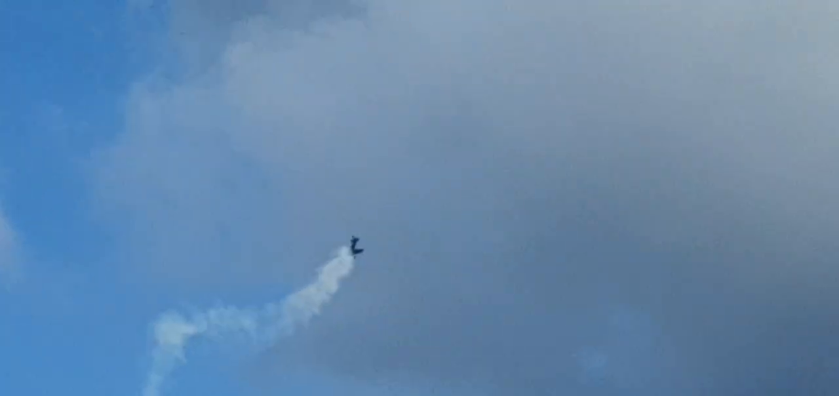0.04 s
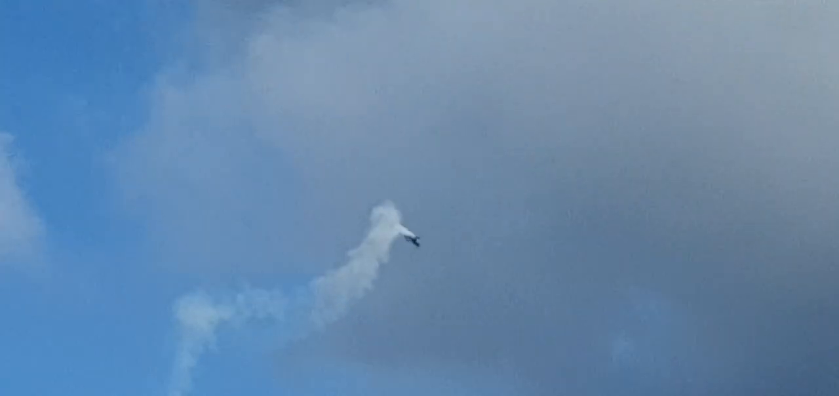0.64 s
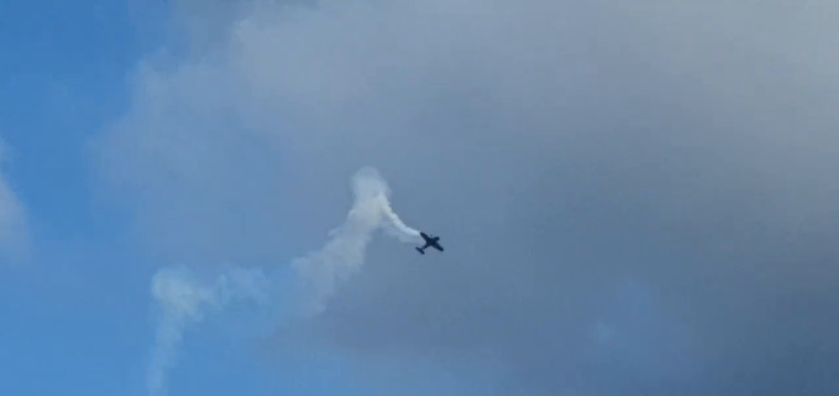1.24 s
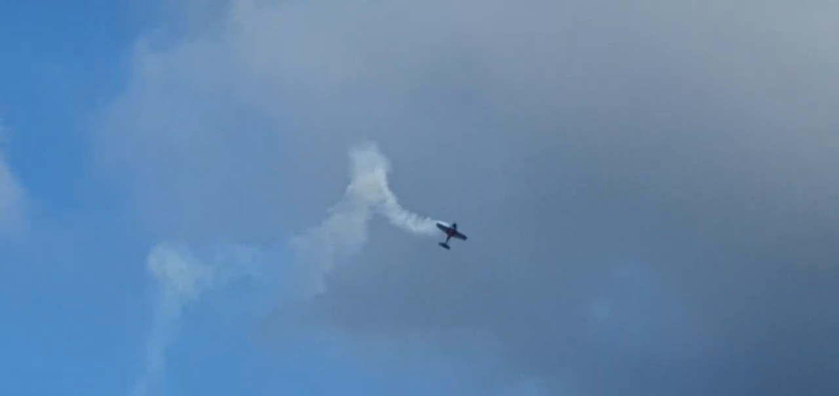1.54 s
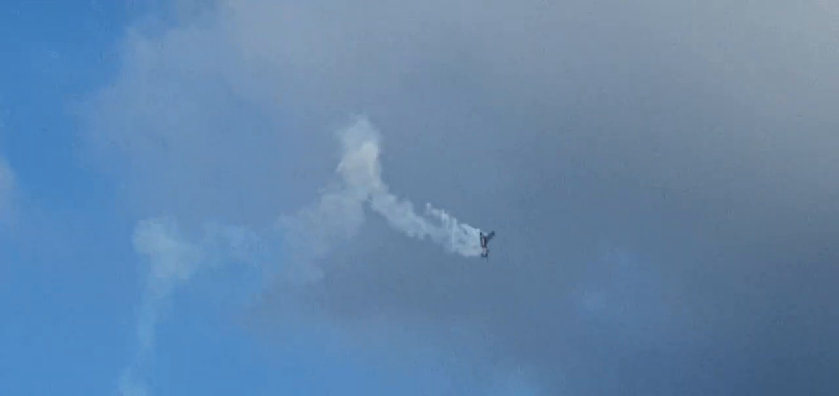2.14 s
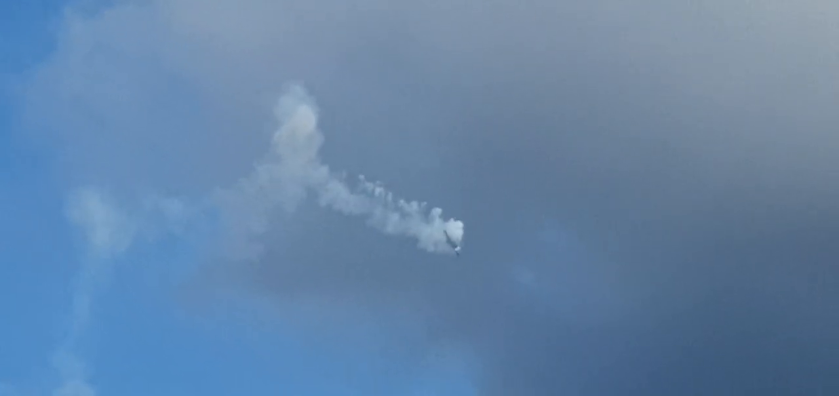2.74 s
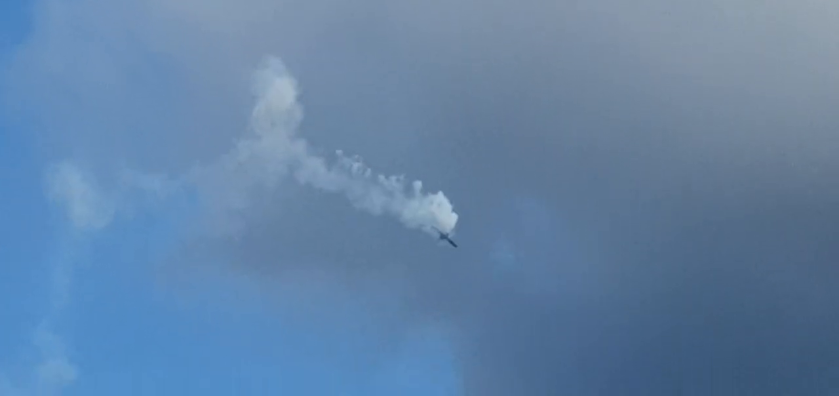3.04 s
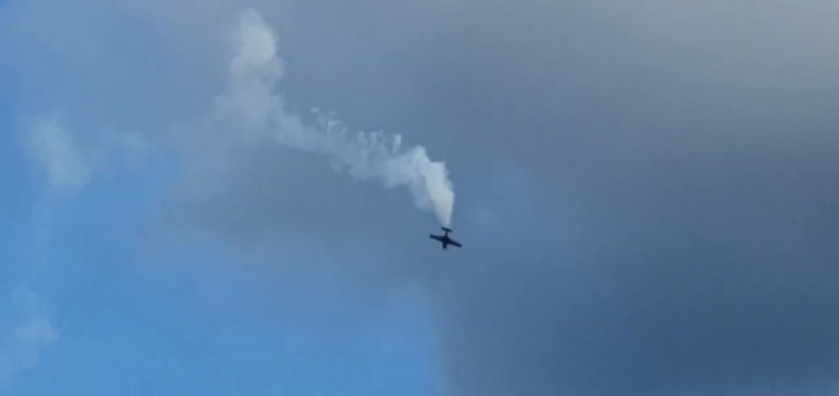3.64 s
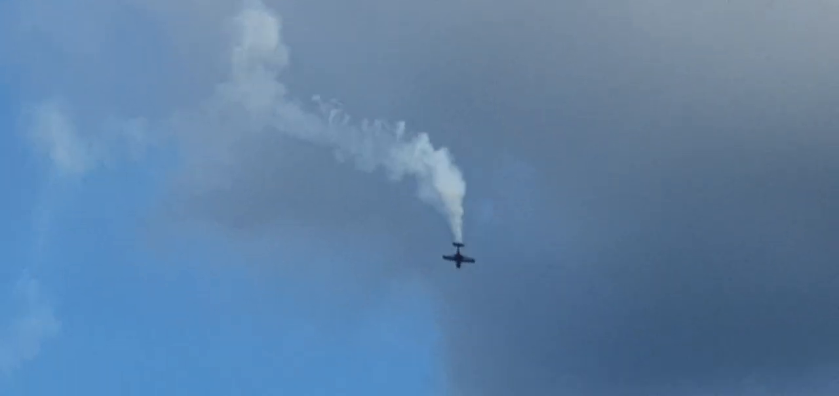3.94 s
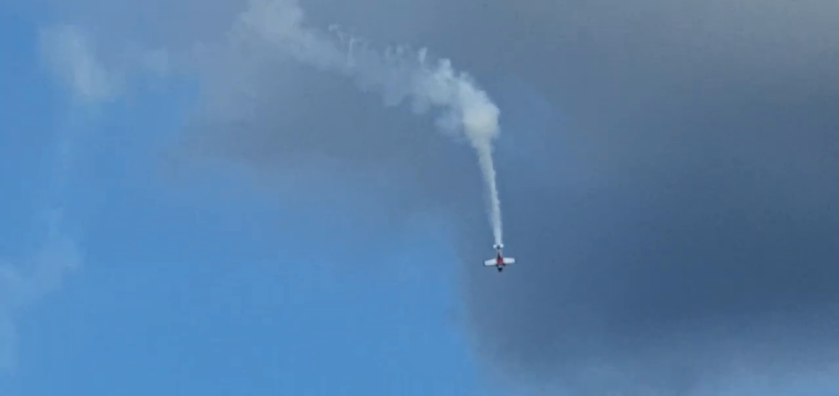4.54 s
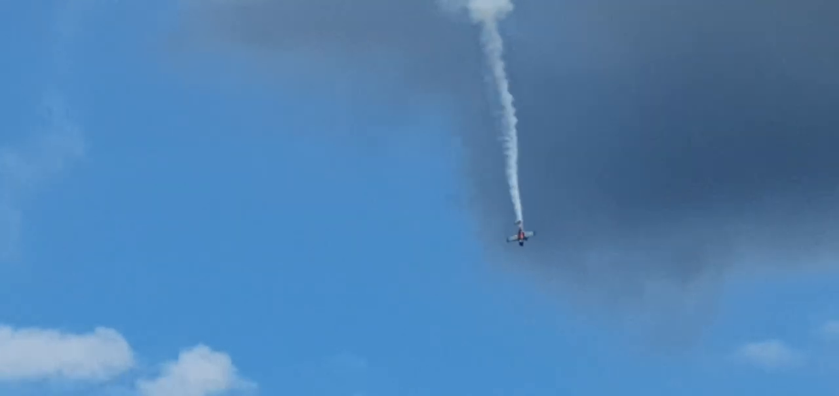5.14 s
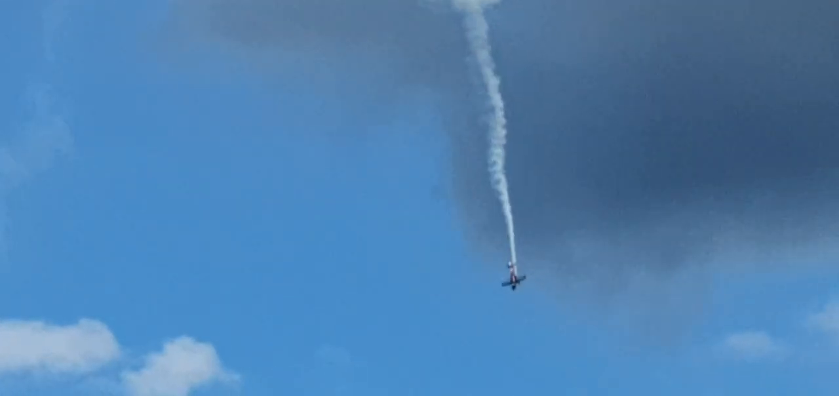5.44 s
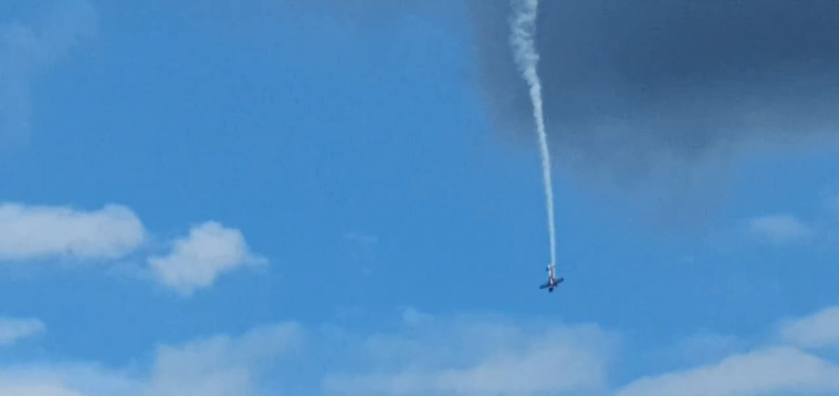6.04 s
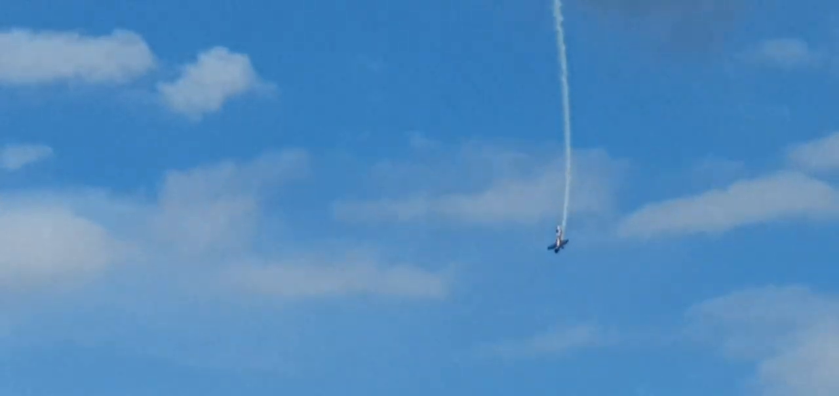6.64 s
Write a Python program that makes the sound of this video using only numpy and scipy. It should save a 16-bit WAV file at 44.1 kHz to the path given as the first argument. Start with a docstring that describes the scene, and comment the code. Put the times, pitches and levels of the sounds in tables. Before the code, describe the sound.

Outdoors on an airfield, low gusts buffet the right side of the microphone while a distant stunt plane hums overhead. The propeller drone comes in uneven waves, with hollow swishes and a raspy edge. The wind eases, and the plane swells again just past the middle, slightly higher and harsher, then dips and surges near the end. Underneath lie a soft field hush and barely audible insects.

```python
"""Over a grass airfield, an aerobatic propeller plane tumbles high up, then dives.
Periodic blade pulses give a harmonic drone that swells and fades as the turning disc beams its sound;
the exhaust adds half orders, and torn air rasps once per blade pass, with a weak ground reflection.
Gusts buffet mostly the right microphone port; insects hiss faintly in the grass, and later one chirps."""
import sys
import numpy as np
from scipy import signal
from scipy.fft import rfft, irfft
from scipy.io import wavfile
from scipy.ndimage import uniform_filter1d

SR = 44100
rng = np.random.default_rng(int(sys.argv[2]) if len(sys.argv) > 2 else 0)


def int16_out(signal):
    """Quantize to a 16-bit WAV file."""
    q = np.round(np.clip(np.atleast_2d(signal).T, -1, 1) * 32767)
    wavfile.write(sys.argv[1], SR, q.astype(np.int16))


N = 299880
TIME = np.arange(N) / SR

# blade-pass rate as heard: (time [s], frequency [Hz])
BLADE_RATE = [(0, 123), (.2, 123), (.6, 119), (1.0, 118.3), (1.2, 122), (1.6, 124.3), (1.95, 126.9),
              (2.3, 125), (2.8, 124.2), (3.3, 125.8), (3.8, 128.9), (4.15, 132), (4.5, 130.2), (5.0, 128.4),
              (5.6, 128.8), (6.0, 131.8), (6.35, 130.2), (6.8, 131.2)]
# scattering by turbulent air and stalled blades: (time [s], roughness [0-1])
ROUGHNESS = [(0, 0.33), (1.4, 0.82), (2.05, 0.37), (2.9, 0.31), (3.5, 0.36), (3.95, 0.39), (4.25, 0.22),
             (4.6, 0.46), (5.35, .24), (5.8, 0.42), (6.2, 0.14), (6.5, 0.7)]
# swells as the disc beams its low harmonics at the listener: (time [s], level [dB], width [s],
# strongest order [x blade rate], fall per order [dB], delay per order [s])
DRONE_SWELLS = [(0.072, -28.5, 0.21, 1.0, 12.5, 0.078), (0.498, -37, 0.13, 0.82, 5, -0.015),
                (0.834, -37.5, .055, 1.0, 22, 0), (0.982, -50, 0.31, 3.0, 11, 0.0095),
                (1.142, -25, 0.056, 1.2, 24, 0.063), (1.711, -19, 0.22, 0.9, 13, .1),
                (2.03, -40, 0.14, 3.0, 12, -0.0042), (2.79, -37.5, 0.11, 0.86, 6, 0.027),
                (3.26, -29, 0.19, 2.3, 12, 0.034), (3.709, -23, 0.3, 1.0, 8, -0.03),
                (3.681, -31, .13, 3.1, 9, -0.0085), (3.862, -22, 0.23, 2.0, 26, -0.013),
                (4.171, -36, 0.44, 3.28, 14, -0.039), (4.975, -44, 0.29, 2.0, 9.5, 0),
                (5.24, -38, .05, 1.1, 4, -0.0011), (5.535, -38, 0.28, 2.7, 5, 0.0036),
                (5.94, -34.5, 0.061, 3.0, 9, 0.0043), (6.103, -30, 0.058, 2.4, 12, 0.017),
                (6.276, -28.5, 0.088, 3.37, 12, 0.0018), (6.76, -25, 0.26, 0.63, 14, -0.078)]
# barks as the higher harmonics point at the listener:
# (time [s], relative level [dB], width [s], centre [Hz])
BARK_SWELLS = [(1.415, -44.5, 0.12, 755), (1.93, -52.5, .09, 730), (3.4, -52.5, 0.44, 757),
               (4.04, -28.5, 0.11, 652), (4.26, -35.5, 0.076, 730), (5.45, -46, 0.24, 647),
               (5.902, -37, 0.11, 657), (6.16, -32.5, 0.027, 830), (6.31, -45.5, 0.16, 695)]
# line spectra: (order [x blade rate], relative level [dB])
BARK_ORDERS = [(5, 14.5), (6, 11.5), (7, -17.5)]  # higher blade harmonics
SNARL_ORDERS = [(8, -2.5), (9, -3), (10, -12), (11, -14), (12, -13), (13, -23.5)]  # steep edge of the blade pulse
EXHAUST_ORDERS = [(.5, -10), (1.5, -28), (2.5, -20.5), (3.5, -26), (4.5, -7.5), (5.5, -5), (6.5, -18)]  # unequal firings
# air torn by the blades: (time [s], relative level [dB], extra gain of the bright edge [dB])
RASP_LEVELS = [(0, -62, -9.5), (.25, -57.5, -25), (.7, -67.5, -10.5), (.98, -55, -15), (1.17, -51, -10),
               (1.42, -52, 0.5), (1.8, -52.5, -6.5), (2.15, -55.5, -0.5), (2.58, -53.5, -14.5),
               (3.05, -52.5, -2), (3.35, -40, -15), (3.67, -44, -3.5), (4.22, -46.5, -12),
               (4.43, -49, -9.5), (5.0, -69, -9), (5.3, -53, -12.5), (5.9, -46, -11), (6.25, -41.5, -17),
               (6.8, -46.5, -9)]
# brief flares of the rasp in the dive: (time [s], boost [dB], width [s])
RASP_FLARES = [(6.178, 9, 0.023), (6.557, 5, .025)]
# ground reflection behind the direct wave: (time [s], lag [s])
REFLECTION_LAG = [(0, 0.0021), (2.2, 0.002), (3, 0.0032), (3.8, 0.0025), (4.5, 0.0028), (6.8, 0.0025)]
# eddies striking the ports: (time [s], relative level [dB], width [s], left minus right [dB])
PORT_GUSTS = [(0.289, -19.5, 0.023, -35), (0.482, -35, .2, -16), (0.97, -29.5, 0.034, -21),
              (1.286, -18, 0.019, -16), (1.339, -27, 0.17, -21), (1.46, -23, 0.048, -7.5),
              (1.752, -14, 0.033, -29.5), (1.825, -21, 0.039, -6.5), (1.885, -23, 0.13, -20),
              (2.014, -12, 0.0091, -31), (2.29, -39, .15, -25.5), (3.38, -34, 0.017, -7),
              (3.996, -33, 0.08, -27), (4.207, -32.5, 0.06, 13.5), (5.797, -41, 0.013, -5),
              (6.68, -38, 0.041, -14)]
# insects in the grass: (time [s], relative level [dB])
CHORUS_LEVELS = [(0, -76.5), (.35, -76), (.7, -79.5), (2.7, -83), (3.9, -77), (4.75, -81.5), (5.6, -77.5),
                 (6.8, -83)]
# hollow swishes of the disc: (time [s], level [dB], width [s], centre [Hz], half bandwidth [Hz])
DISC_SWISHES = [(0.985, -50, 0.45, 300, 120), (1.404, -38.5, 0.054, 870, 280),
                (1.38, -45.5, .035, 1666, 500), (1.528, -49, 0.036, 2100, 200),
                (1.544, -71.5, .04, 3780, 442), (1.575, -44.5, 0.079, 577, 151),
                (1.702, -50, 0.029, 1170, 161.4), (3.132, -56.5, .08, 2630, 300),
                (3.359, -44, 0.074, 1090, 257), (3.424, -44, 0.19, 590, 160), (3.688, -38, 0.14, 325, 160),
                (3.708, -46, 0.058, 785, 251), (5.88, -39, 0.02, 695, 260), (6.166, -42, 0.011, 1210, 200),
                (6.544, -44, 0.04, 780, 258), (6.772, -40, 0.062, 1146, 238)]
# noise spectra: (frequency [Hz], relative spectral density [dB])
RASP_BODY_SPECTRUM = [(90, -27), (170, 4), (300, 7.5), (450, 4), (750, 5), (950, 0), (1150, 1), (1500, -4),
                      (2100, -15.5), (3200, -45.5), (4500, -65.5)]
RASP_EDGE_SPECTRUM = [(700, -22), (1300, 2), (1700, 2.5), (2050, 3.5), (2350, -2.5), (2700, -1.5),
                      (3300, -11), (3650, -17), (4100, -31.5), (5500, -45), (9000, -51)]
FIELD_SPECTRUM = [(20, -25), (60, -1), (120, 7), (200, -4), (400, -2), (700, -3), (1200, -16.5),
                  (2000, -32), (3200, -45), (4500, -41), (7000, -63.5), (12000, -71)]
RUMBLE_SPECTRUM = [(18, -29.5), (30, -13), (48, -2), (70, -8), (100, -4), (180, -22), (600, -50),
                   (4000, -100)]  # light air passing both ports
EDDY_SPECTRUM = [(18, -40.5), (30, -17.5), (45, -14.5), (60, 10.5), (78, 5.5), (100, -1.5), (150, -8.5),
                 (220, -22.5), (400, -43), (900, -68.5), (4000, -104)]
INSECT_BUZZ_SPECTRUM = [(2000, -58), (4500, -14.5), (6500, -12), (7300, -10), (8200, -4.5), (9700, -8),
                        (10500, -12), (12500, -14.5), (15000, -30)]
INSECT_HISS_SPECTRUM = [(10000, -21.5), (12500, -5.5), (13500, 3.5), (15500, 3.5)]
PUFF_SPECTRUM = [(1000, -16), (3000, 9), (5000, 4.5), (7000, -10), (15000, -1)]
CHIRP_SPECTRUM = [(4000, -51), (7000, -16), (8300, -2), (9300, 1), (10300, -7), (12000, -11),
                  (15000, -41.5)]


def undb(db):
    """Amplitude ratio of a level in decibels."""
    return 10 ** (np.asarray(db) / 20)


def curves(table):
    """Linear interpolation in time of each column after the first."""
    times, *columns = np.transpose(table)
    return [np.interp(TIME, times, column) for column in columns]


def unit(x):
    """Normalisation to rms 1."""
    return x / np.sqrt(np.mean(x ** 2))


def colour(x, spectrum):
    """Spectral shaping by (frequency [Hz], level [dB]) points; rms 1."""
    hz, db = np.transpose(spectrum)
    bin_hz = np.maximum(np.arange(N // 2 + 1) * SR / N, 1)
    gain = undb(np.interp(np.log(bin_hz), np.log(hz), db))
    return unit(irfft(rfft(x) * gain, N))


def noise():
    """Incoherent white noise in two channels."""
    return rng.standard_normal((2, N))


def spread(side_db):
    """Partly coherent white noise: a common mid plus a side in antiphase."""
    mid, side = noise()
    return mid + undb(side_db) * side * np.array([[1], [-1]])


def pan(left_db):
    """Level-difference panning: two gains, left_db apart."""
    return undb(np.array([[left_db], [-left_db]]) / 2)


def wander(rate_hz):
    """Smooth random modulation, changing about rate_hz times a second; rms 1."""
    hold = int(SR / rate_hz)
    steps = np.repeat(rng.standard_normal(N // 100)[:N // hold + 1], hold)
    return unit(uniform_filter1d(uniform_filter1d(steps, hold), hold)[:N])


def bump(time, width):
    """Gaussian envelope with standard deviation width."""
    return np.exp(-np.minimum(((TIME - time) / width) ** 2, 50) / 2)


def lobe(time, width, order=1, steepness=9.2, narrowing=0.36):
    """Envelope of a passing radiation lobe: the higher the order, the shorter and steeper."""
    skirt = steepness * order
    offset = (TIME - time) * order ** narrowing / width
    return (1 + offset ** 2 / skirt) ** (-skirt / 2)


def partial(order, phase, rough, flutter_hz=24, full_order=4, lead_rad=0.4, drift_rad=0.063):
    """Scattering: one order is a direct wave plus a random share that grows up to full_order."""
    share = np.clip(rough * min(order / full_order, 1), 0, 1)
    in_phase = np.sqrt(2 * (1 - share ** 2)) + share * wander(flutter_hz)
    # low orders lead in phase, so the pulses come out lopsided; the long air path lets higher ones drift
    angle = order * phase + lead_rad / order + drift_rad * (order - 1) * wander(rate_hz=3)
    return -in_phase * np.cos(angle) + share * wander(flutter_hz) * np.sin(angle)


def drone_level(order, rest_db=-48.5, rest_fall_db=8, flicker_db=0.7, rest_flicker_db=3.0):
    """Directivity: a low harmonic's level [dB] as lobes sweep over a faint, flickering drone."""
    rest = undb(rest_db - rest_fall_db * (order - 1.5)) ** 2
    power = rest
    for time, db, width, strongest, fall_db, delay in DRONE_SWELLS:
        gain = undb(db - fall_db * abs(order - strongest))
        power = power + (gain * lobe(time + delay * (order - 1), width, order)) ** 2
    depth_db = flicker_db + rest_flicker_db * np.sqrt(rest / power)
    return 10 * np.log10(power) + depth_db * wander(rate_hz=11)


def bark_beam(rest_db=-59, rest_hz=633):
    """Power summation of lobes: the bark's relative level [dB] and power-weighted centre [Hz]."""
    power = undb(rest_db) ** 2
    weighted_hz = power * rest_hz
    for time, db, width, hz in BARK_SWELLS:
        share = (undb(db) * lobe(time, width)) ** 2
        power = power + share
        weighted_hz = weighted_hz + share * hz
    return 10 * np.log10(power), weighted_hz / power


def propeller(blade_hz, phase, rough, bark_gain_db=-2, peak_width_hz=100, peak_db=7, snarl_db=-20):
    """Fourier series of the blades' suction pulses: a low drone, a higher bark and a snarl on top."""
    drone = sum(undb(drone_level(k)) * partial(k, phase, rough) for k in range(1, 5))
    bark_db, centre_hz = bark_beam()
    gains = {}
    for k, db in BARK_ORDERS:
        detuning = (k * blade_hz - centre_hz) / peak_width_hz
        gains[k] = undb(db + peak_db / (1 + detuning ** 2))
    bark = sum(gain * partial(k, phase, rough) for k, gain in gains.items())
    bark /= np.sqrt(sum(gain ** 2 for gain in gains.values()))
    snarl = undb(snarl_db) * partials(SNARL_ORDERS, phase, rough)
    return drone + undb(bark_db + bark_gain_db) * (bark + snarl)


def partials(orders, phase, rough):
    """Superposition of the partials of a line spectrum."""
    return sum(undb(db) * partial(k, phase, rough) for k, db in orders)


def exhaust(phase, gain_db=-15):
    """Period doubling: unequal firings put weak lines halfway between the blade harmonics."""
    bark_db, _ = bark_beam()
    return undb(bark_db + gain_db) * partials(EXHAUST_ORDERS, phase, rough=0.9)


def rasp(phase, rough, gate_depth=0.17, scatter_db=1.14, body_db=4, edge_db=2, snarl_db=-7.5):
    """Turbulence noise, pulsed once per blade pass; in smooth flight part becomes a pitched snarl."""
    level_db, bright_db = curves(RASP_LEVELS)
    level_db += sum(db * bump(time, width) for time, db, width in RASP_FLARES)
    smooth = np.clip(1 - rough, 0, 1) ** 2
    bursts = np.exp(gate_depth * np.cos(phase)) * undb(scatter_db * wander(rate_hz=130))
    body = colour(bursts * spread(side_db=-8.0), RASP_BODY_SPECTRUM) * pan(left_db=1.0)
    body *= undb(body_db - 6 * smooth)
    edge = colour(bursts * spread(side_db=-5.5), RASP_EDGE_SPECTRUM) * pan(left_db=5.5)
    edge *= undb(edge_db + bright_db)
    snarl = smooth * undb(snarl_db) * partials(SNARL_ORDERS, phase, rough)
    return undb(level_db) * (body + edge + snarl)


def scintillation(x, depth_db=2.5, patch_hz=190, patch_s=.11):
    """Refraction in turbulent air focuses and thins each narrow band on its own."""
    hz, times, bins = signal.stft(x, SR, nperseg=1024)
    patches = rng.standard_normal(bins.shape[1:])
    for _ in range(2):
        patches = uniform_filter1d(patches, max(int(patch_hz / hz[1]), 1), axis=0)
        patches = uniform_filter1d(patches, max(int(patch_s / times[1]), 1), axis=1)
    return signal.istft(bins * undb(depth_db * unit(patches)), SR)[1][:, :N]


def ground_reflection(x, reflectance=0.18):
    """Comb interference: the grass returns a weaker copy whose lag shifts with the plane's bearing."""
    lag, = curves(REFLECTION_LAG)
    return np.array([direct + reflectance * np.interp(TIME - lag, TIME, direct) for direct in x])


def open_field(level_db=-51.5, drift_db=0.87):
    """Ambient noise: a low hush under slow amplitude modulation."""
    hush = colour(spread(side_db=-5.5), FIELD_SPECTRUM)
    return hush * undb(level_db + drift_db * wander(rate_hz=1.7))


def wind(rumble_db=-43, calming_db=-5, flutter_db=3):
    """Turbulent pressure: light air rumbles on both ports, and gusts mostly strike the right one."""
    rumble = colour(spread(side_db=-10), RUMBLE_SPECTRUM)
    rumble *= undb(rumble_db + calming_db * TIME / TIME[-1] + flutter_db * wander(rate_hz=30))
    pressure = 0
    for time, db, width, left_db in PORT_GUSTS:
        ports = pan(left_db)
        pressure = np.hypot(pressure, undb(db) * bump(time, width) * ports / ports.max())
    flow = colour(noise(), EDDY_SPECTRUM)
    # an eddy's strength is set by its gust, so the flow's own slow swings are evened out
    flow /= np.sqrt(uniform_filter1d(flow ** 2, size=1800) + 0.039)
    return rumble + pressure * flow


def insect_chorus(buzz_gain_db=3, hiss_db=-92, rise_db_per_s=3.5):
    """Incoherent summation: many insects merge into a faint buzz and a steadily growing high hiss."""
    chorus_db, = curves(CHORUS_LEVELS)
    buzz = colour(noise(), INSECT_BUZZ_SPECTRUM) * undb(chorus_db + buzz_gain_db)
    hiss = colour(noise(), INSECT_HISS_SPECTRUM) * undb(hiss_db + rise_db_per_s * TIME)
    return buzz + hiss * pan(left_db=-2)


def puff(level_db=-73):
    """Broadband noise under a Gaussian envelope: a soft hiss with the first gust."""
    return undb(level_db) * bump(time=0.28, width=0.22) * colour(noise(), PUFF_SPECTRUM)


def swishes(phase, gate_depth=0.5):
    """Band-limited blade noise, modulated at the blade rate, swells as the disc slews through the air."""
    bursts = np.exp(gate_depth * np.cos(phase))
    total = 0
    for time, db, width, hz, half_band in DISC_SWISHES:
        band = [(hz / 4, -70), (hz - half_band, -14), (hz - half_band / 3, 0),
                (hz + half_band / 3, 0), (hz + half_band, -12), (hz * 3, -70)]
        total += undb(db) * bump(time, width) * colour(bursts * spread(side_db=-18.5), band)
    return total * pan(left_db=1.0)


def insect_chirps(start_s=4.525, period_s=.154, quicken_s=.00092, level_db=-72, onset_db=-5, count=12):
    """Pulse modulation of a high band: one insect chirps about seven times a second, quickening a little."""
    envelope = 0
    for k in range(count):
        time = start_s + k * (period_s - k * quicken_s)
        envelope += undb(level_db + onset_db * np.exp(-k)) * bump(time, width=.024)
    return envelope * colour(noise(), CHIRP_SPECTRUM)


def scene():
    """Superposition of the distant plane, the field, and the wind and insects near the microphone."""
    blade_hz, = curves(BLADE_RATE)
    rough, = curves(ROUGHNESS)
    wavering_hz = blade_hz * (1 + 0.0017 * wander(rate_hz=14))
    phase = 2 * np.pi * np.cumsum(wavering_hz) / SR
    tones = propeller(blade_hz, phase, rough) + exhaust(phase)
    torn_air = ground_reflection(scintillation(rasp(phase, rough))) + swishes(phase)
    return tones + torn_air + open_field() + wind() + puff() + insect_chorus() + insect_chirps()


def record(dry, fade_s=.004, cutoff_hz=15800):
    """Windowing and band limiting: a short fade at each end, then a steep low-pass."""
    from_end_s = np.minimum(TIME, TIME[-1] - TIME)
    fade = np.sin(np.pi / 2 * np.minimum(from_end_s / fade_s, 1)) ** 2
    lowpass = signal.ellip(8, .2, 70, cutoff_hz, fs=SR, output="sos")
    return signal.sosfilt(lowpass, fade * dry)


dry = scene()
out = record(dry)
int16_out(out)
```